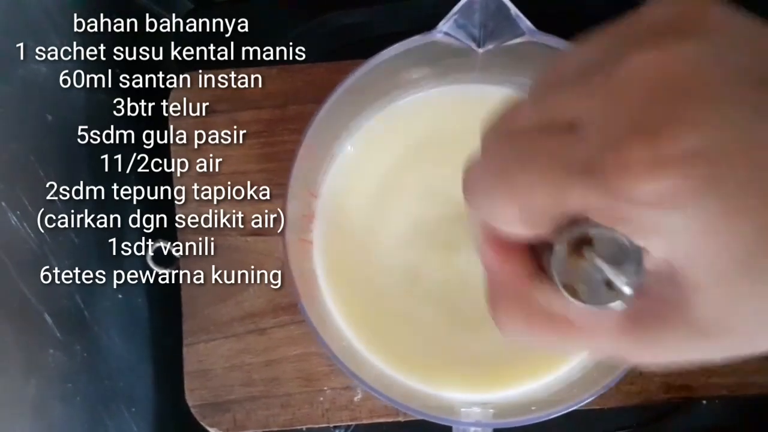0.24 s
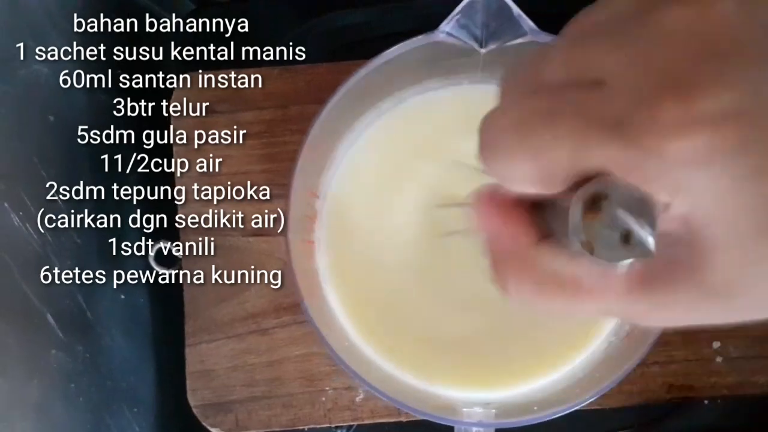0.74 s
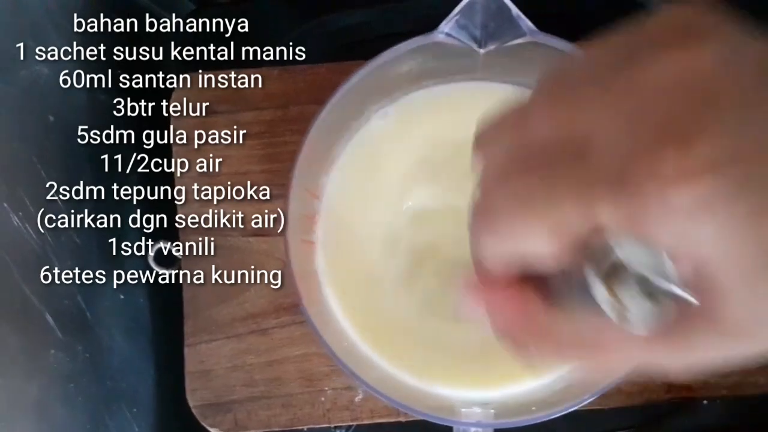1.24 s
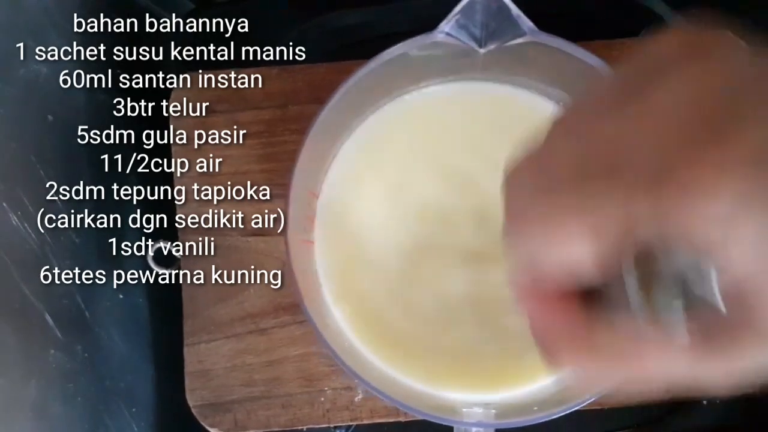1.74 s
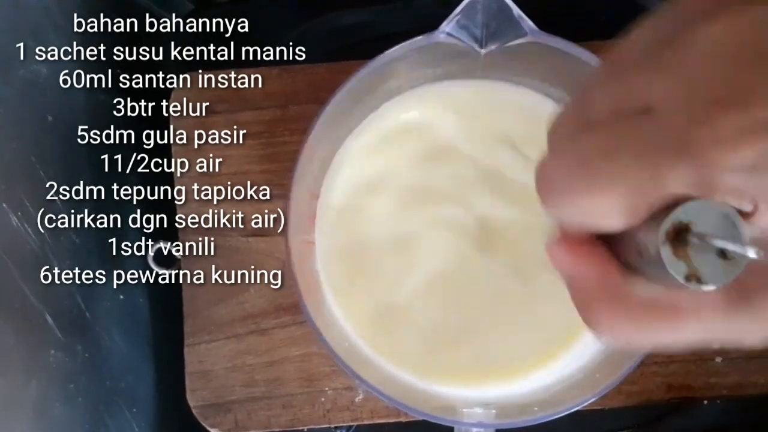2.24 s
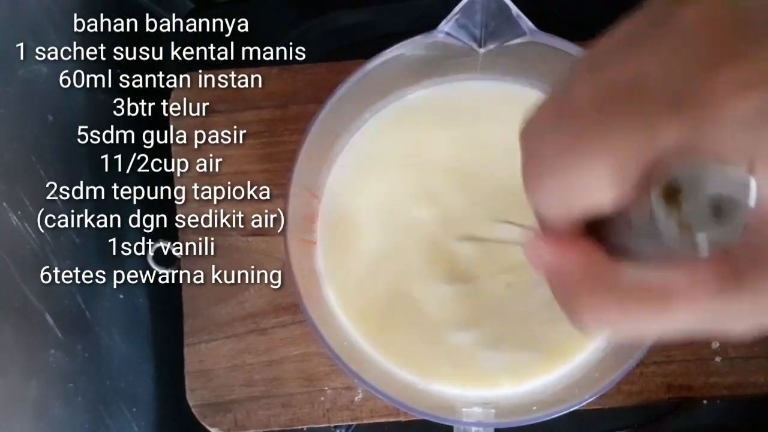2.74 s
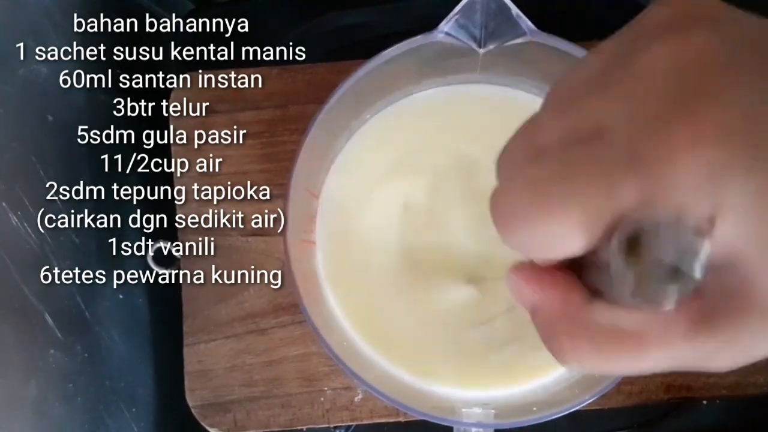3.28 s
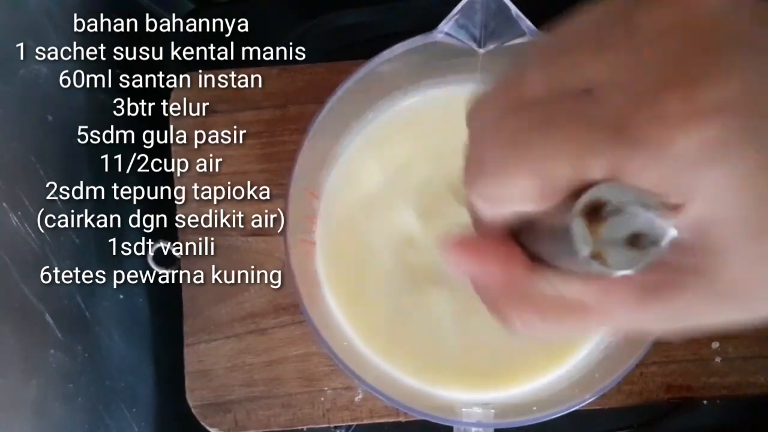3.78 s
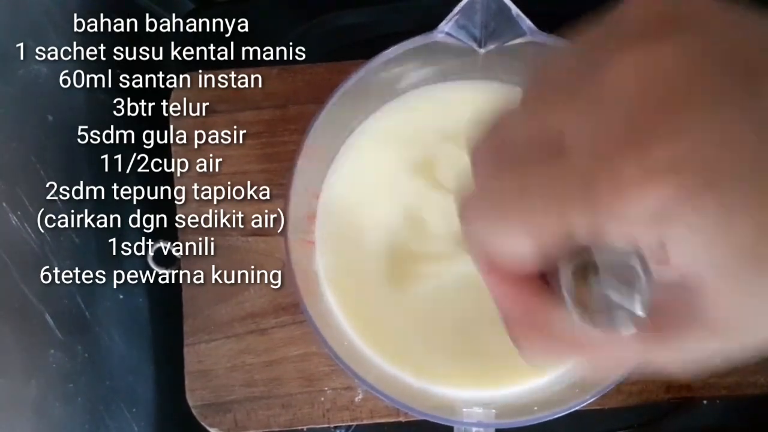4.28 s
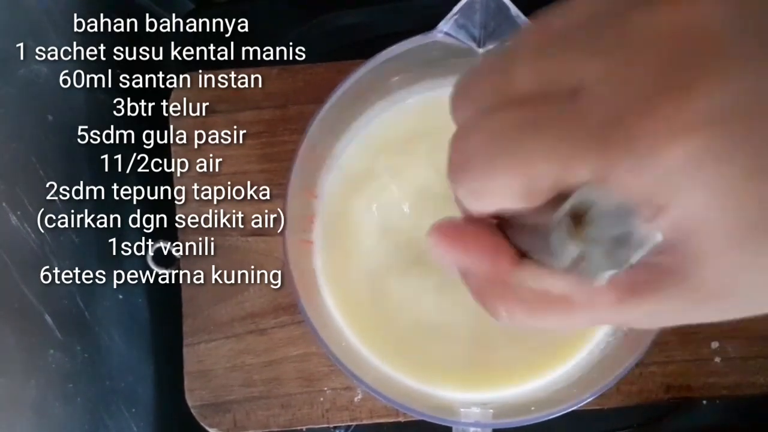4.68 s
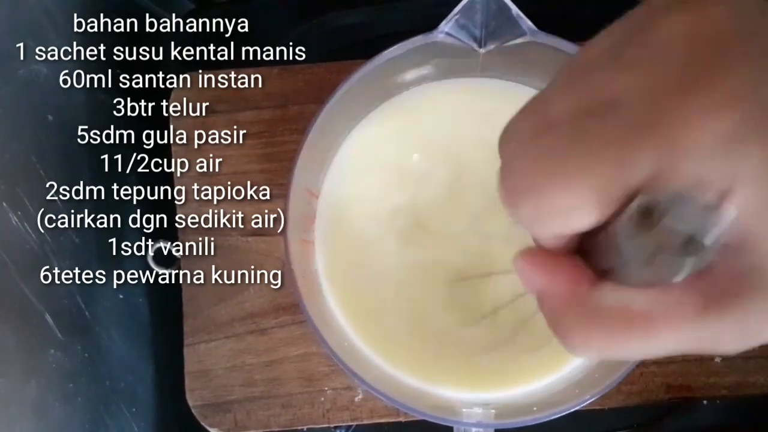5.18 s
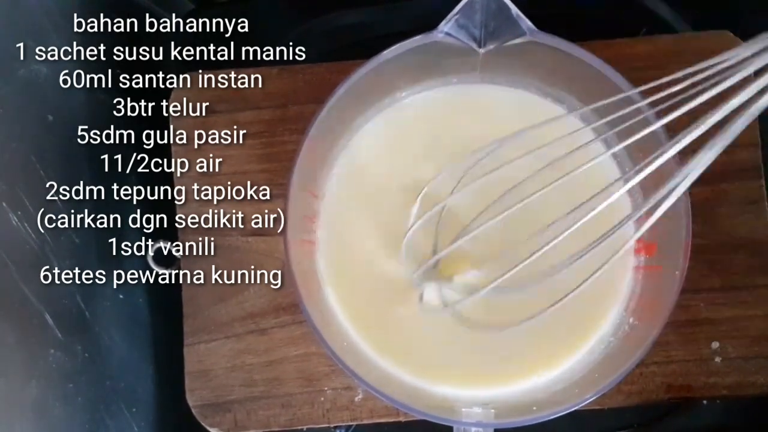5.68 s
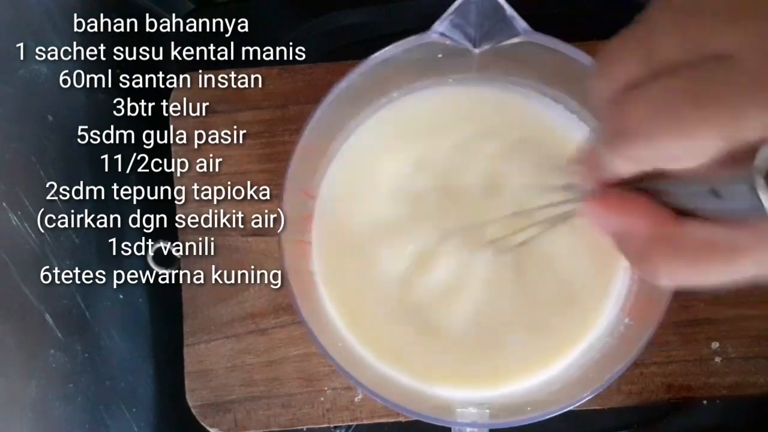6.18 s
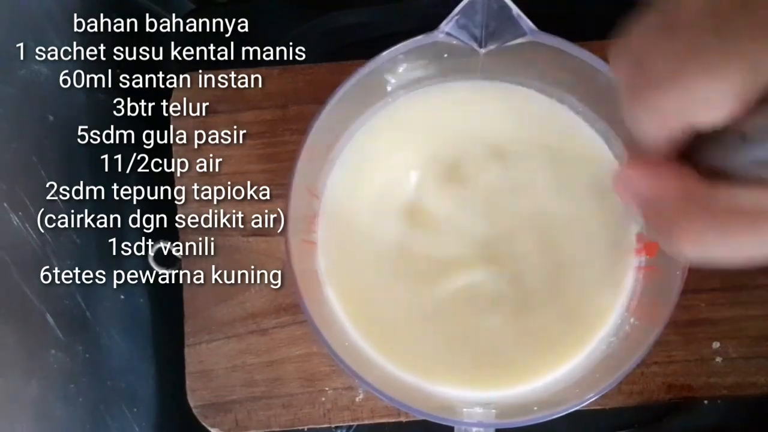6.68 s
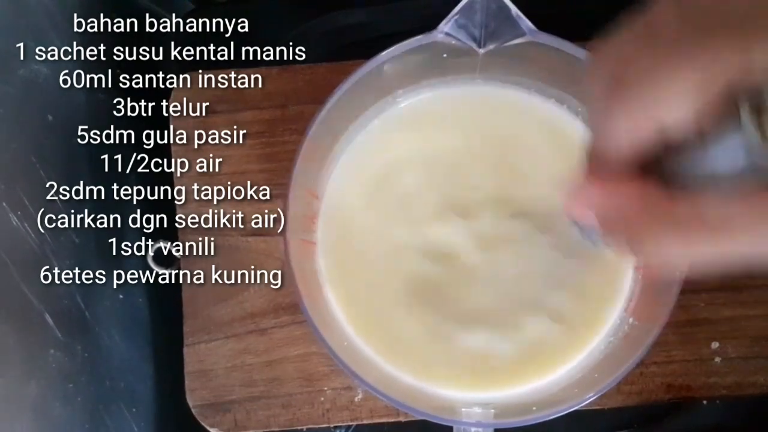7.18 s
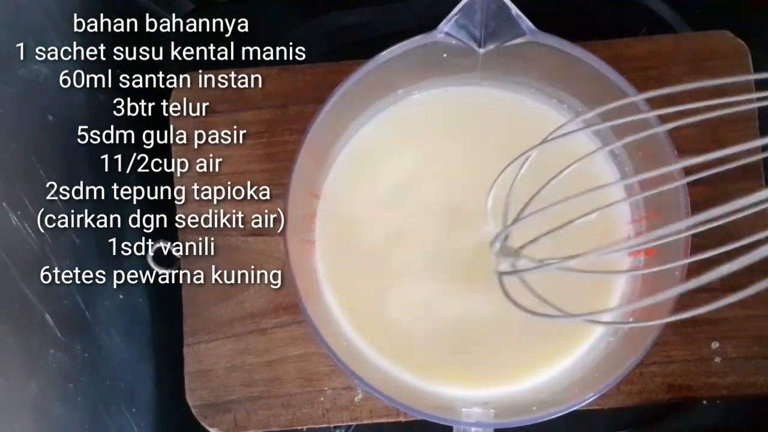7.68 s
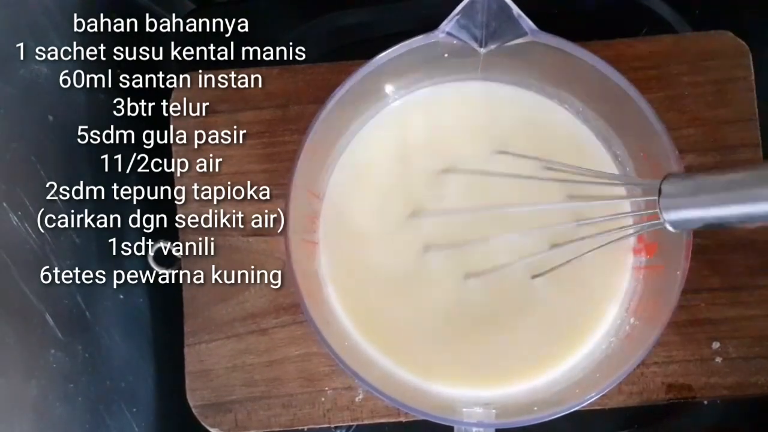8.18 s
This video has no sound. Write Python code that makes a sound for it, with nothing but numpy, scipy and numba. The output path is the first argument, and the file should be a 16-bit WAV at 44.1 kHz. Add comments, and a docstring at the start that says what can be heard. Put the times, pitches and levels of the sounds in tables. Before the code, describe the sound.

Quick, clattering whisking of thin liquid in a plastic jug, with hollow slops and small bubbles, in a hard little kitchen above distant engines.

```python
"""Whisk wires rattle and drag on the wall of a plastic jug; thin batter surges and gulps under them.
Grainy contact noise rings the jug modes; surges and swirl drive its low modes; bubbles are rising tones.
A small hard kitchen answers with a noise tail. Outside, wavering tones are passing engines and shaped
noise is the street. A phone with two microphones tints, rounds and band-limits the sum."""
import sys
import numpy as np
from numba import njit
from scipy import signal
from scipy.fft import rfft, irfft, next_fast_len
from scipy.io import wavfile
from scipy.ndimage import uniform_filter1d

SR = 44100
rng = np.random.default_rng(int(sys.argv[2]) if len(sys.argv) > 2 else 0)


def file_out(sig):
    """Save sig as 16-bit WAV at sys.argv[1]."""
    # one column per channel
    cols = np.atleast_2d(sig).T
    # limit, then scale
    lim = np.clip(cols, -1, 1)
    pcm = np.round(lim * 32767).astype(np.int16)
    wavfile.write(sys.argv[1], SR, pcm)


N = 371763

# Wires meeting the wall: peak t/s, level/dB, low range re level/dB, rise/ms, fall/ms (6 dB times)
TAPS = [(0.0267, -36, -1, 1.8, 1.7), (.051, -32.5, 2, 12.6, 2.6), (.0619, -26, -3, 2.5, 4.9),
        (.0803, -30, 2.5, 1.8, 6.1), (0.1404, -31.5, 2.5, 7.3, 3.5), (.192, -38, -4, 18, 7.7),
        (.2063, -37, 2, 8.8, 19), (.2404, -40, 6, 3.8, 8.7), (.2658, -31, -13, 2.4, 3.2),
        (.283, -34, -2, 1.5, 10), (.321, -35, -3, 6, 3), (0.3558, -35.5, -1, 2.8, 9.1),
        (.402, -37, 2, 1.7, 14), (.4346, -30, -3, 11.5, 6.5), (0.4496, -30, -5, 10.4, 2.9),
        (0.504, -34.5, -8, 2.3, 5.6), (.522, -36, 1, 6.8, 2.1), (.539, -32, -3, 2, 3.1),
        (.5533, -32, -5, 2.2, 2.4), (0.584, -48, 4, 3.1, 4.2), (0.6192, -28.5, 0.5, 4.3, 5.2),
        (0.655, -36, 1, 3.8, 16), (.6936, -32.5, -2, 4.6, 2), (.7069, -33.5, -1, 8.3, 3.5),
        (0.721, -27.5, -6, 1.7, 2.2), (.7474, -31, -9, 2.1, 2.2), (.78, -40, -1, 6.9, 3),
        (0.838, -41, 0, 2.2, 3.5), (.8519, -35, -4, 1.8, 4.7), (0.8668, -27.5, -1, 2.5, 10),
        (.94, -39, 1, 1.8, 8.6), (.962, -37.5, 0, 4.5, 7.6), (0.9938, -26.5, 1.5, 6, 5.5),
        (1.013, -27, -1, 2.8, 2), (1.0693, -43, 0, 1.8, 5.6), (1.093, -31, 0, 8.1, 5.1),
        (1.144, -32, -4, 4.8, 4.1), (1.1567, -32, -1, 3.2, 5.3), (1.172, -36.5, 1, 2.6, 4),
        (1.189, -26, -4.5, 1.9, 3.2), (1.2514, -39.5, 6, 3.1, 4.9), (1.2895, -34, -0.5, 3, 9.8),
        (1.3038, -36.5, 1, 1.3333, 9.4), (1.3391, -49, 14.5, 9.8, 3.6), (1.4, -31.5, -3, 2.9, 5.6),
        (1.4066, -26, -8, 3.4, 4), (1.431, -34, 3, 5, 2.3), (1.438, -31.5, 1, 2.3, 8.9),
        (1.4531, -31.5, -6, 7.1, 4.6), (1.481, -31.5, -6, 1.5, 5.3), (1.509, -39, 8, 4.1, 2.7),
        (1.5367, -34.5, 0, 6.5, 12.4), (1.5833, -38.5, -1.5, 6, 21), (1.6102, -34, -2, 1.8, 3.1),
        (1.701, -32, -8, 5.9, 2.9), (1.7101, -31.5, -9, 3.3, 12), (1.7412, -30, 1, 11.3, 6.8),
        (1.7784, -28.5, -9, 1.3, 1.5), (1.9575, -25.5, -5.5, 3.5, 2.7), (2.042, -32, -3, 6.4, 10),
        (2.065, -30, -8, 1.3, 1.3), (2.096, -38.5, 2, 9.8, 4.1), (2.1203, -44.5, 9, 6.2, 2.1),
        (2.1613, -31.5, 2, 11.6, 4.6), (2.178, -32, 0, 1.6, 3.3), (2.2265, -44, -1, 2.4, 4.6),
        (2.2577, -28, -5, 10.4, 3.5), (2.284, -35, 2, 3.2, 1.8), (2.3035, -40, 0, 7.8, 5.5),
        (2.323, -32.5, 3.5, 1.4, 4.2), (2.3485, -33, -9, 5.5, 3.7), (2.3995, -25.5, -2.5, 2.5, 5),
        (2.4037, -23, -1, 2.5, 5.9), (2.42, -30, -3.5, 3.1, 12), (2.4802, -28, 1.5, 1.1, 5.9),
        (2.4937, -25, -8, 2.5, 3.5), (2.558, -21, -2.5, 4.3, 6.4), (2.626, -25.5, -20, 1.7, 3.8),
        (2.639, -38, 4.5, 9.6, 1.2), (2.713, -19.5, -3.5, 8.7, 3.2), (2.7693, -32.5, -6, 1.2, 6.4),
        (2.7923, -29.5, -7.5, 8.6, 6.2), (2.8064, -35.5, -4, 2.1, 3.4), (2.863, -22, -3, 2.3, 5.1),
        (2.9161, -35, -4, 3.8, 4.8), (2.9283, -26, -10.5, 5.3, 5.7), (2.9994, -27.5, 0, 1.8, 6.3),
        (3.0198, -33, 4.5, 2.5, 5), (3.0565, -24, -8, 1.5, 5), (3.0686, -25, -5.5, 6.5, 5.1),
        (3.1428, -24, -8.5, 6.9, 3.1), (3.1572, -33, 4.5, 4.5, 1.8), (3.1922, -25.5, 0, 2.1, 5),
        (3.201, -24, -3, 2.1, 3.6), (3.279, -33.5, 3.5, 6.1, 11), (3.3064, -30.5, -2, 1.5, 1.8),
        (3.3418, -32, 2, 6, 10.3), (3.411, -20, -3, 1.85, 7.8), (3.4556, -36.5, -2, 7.3, 2.3),
        (3.485, -27.5, -5, 1.6, 6.4), (3.5563, -23, -2, 4.4, 8.4), (3.5827, -31, -1, 3.6, 3.6),
        (3.6444, -27.5, -4, 3.3, 5.9), (3.7197, -21.5, -2.5, 3.5, 3.7), (3.734, -32, 3.5, 4.6, 6.4),
        (3.772, -30.5, -5, 2, 7.5), (3.795, -28.5, -6.5, 4.7, 3), (3.8584, -22.5, -4, 1.1, 5.4),
        (3.885, -30, 2.5, 8.3, 2.6), (3.905, -40, 5, 3.3, 8.3), (3.9392, -42, -1, 7.2, 9.8),
        (4.0097, -25, 0, 4.2, 6.8), (4.0258, -29.5, 2.5, 5.7, 2.6), (4.078, -26.5, -6, 3.4, 6.1),
        (4.156, -24.5, -3, 1.9, 7.9), (4.214, -36, 1, 2, 5), (4.2235, -25.5, -5, 3.2, 4.3),
        (4.2936, -23.5, -4, 3.4, 9.6), (4.3156, -31, 3, 2.9, 5.5), (4.3514, -35.5, 1, 2.1, 4),
        (4.3617, -31.5, -2, 2.8, 7.7), (4.438, -23, -1.5, 1.6, 6.3), (4.446, -24.5, -7, 3.3, 4.3),
        (4.4753, -34, 3, 4.1, 3.6), (4.503, -33, -5.5, 3.2, 7.8), (4.5959, -34, 3, 5.2, 6.5),
        (4.6207, -30, 9.5, 6.2, 3.4), (4.659, -31.5, -11, 10, 5.2), (4.674, -27, -8, 2.6, 2.7),
        (4.7423, -25.5, 0, 3.1, 1.4), (4.766, -31, 3.5, 6.6, 3), (4.8102, -24.5, -7, 1.25, 2.7),
        (4.8809, -28, 1.5, 3.4, 5.5), (4.89, -29, 0, 4, 9.1), (4.9517, -29.5, -14.5, 2.3, 8.2),
        (4.9672, -28.5, -0.5, 1.9, 2.6), (5.0371, -35, 1.5, 5.8, 7.8), (5.0562, -37.5, 4.5, 5.8, 12),
        (5.094, -24.5, -6.5, 3.3, 5.3), (5.1058, -25, -4, 1.8, 3.9), (5.176, -26.5, -5, 7.1, 6.9),
        (5.201, -39.5, 2.5, 2.7, 5.3), (5.22, -40, 7.5, 5.2, 9), (5.237, -25, -13.5, 3.3, 7.9),
        (5.252, -26, -7, 1.4, 3.1), (5.3254, -30, -3, 4, 6.7), (5.343, -29, -5, 2.8, 2.7),
        (5.3952, -23.5, -8.5, 6.7, 3.6), (5.4825, -42.5, 7.5, 3.2, 6.5), (5.504, -41.5, 5, 6.2, 22),
        (5.533, -23.5, -4.5, 1.3, 3.5), (5.958, -55, -13.5, 1, 3), (5.9814, -56, -8, 1.8, 1.6),
        (5.9965, -56, -7, 1.7, 1.5), (6.0311, -43.5, 5, 5.5, 1.6), (6.0474, -47.5, 13.5, 2.4, 4.6),
        (6.0735, -22.5, -2.5, 1.9, 1.9), (6.1456, -32.5, -7, 3.9, 6.3), (6.221, -33.5, 2, 1.9, 11),
        (6.228, -32.5, -2, 1.8, 4.3), (6.2946, -29.5, -15, 2.5, 3.2), (6.3058, -27, -9.5, 2.6, 4.5),
        (6.388, -19, -5.5, 5.3, 2.2), (6.424, -41, 5, 4.9, 4.9), (6.448, -28, -13, 2, 2.6),
        (6.459, -26.5, -10, 2.6, 4.2), (6.5294, -19, -3, 3.5, 5.7), (6.546, -30.5, 3, 2.9, 3.3),
        (6.5932, -38, -6, 1.8, 2.4), (6.612, -25, -5.5, 0.59, 0.48), (6.698, -35.5, 2.5, 1.5, 3.1),
        (6.7135, -34, -9, 2.5, 1.6), (6.7406, -29.5, -6, 1.5, 5.6), (6.756, -36, -2, 1.8, 5),
        (6.8344, -28.5, 0.5, 2.6, 6.7), (6.8792, -38, -1, 10, 9.4), (6.8955, -20.5, -6, 1.5, 2.5),
        (6.971, -21, -8, 1.5, 1.7), (6.9998, -39.5, 2.5, 14, 13), (7.0398, -28.5, -7.5, 1.7, 7.2),
        (7.051, -25, -3, 2.1, 2.7), (7.117, -34.5, 4, 14, 2.7), (7.133, -23, -7, 2.9, 2.2),
        (7.2139, -37.5, 2, 3.7, 6.9), (7.2882, -26, 1.5, 1.7, 3.4), (7.3113, -51, 8, 2, 1.7),
        (7.3575, -52, 9, 5.4, 9), (7.381, -31, -6, 2.4, 1.7), (8.1582, -43.5, -4.5, 1.6, 3.1),
        (8.2086, -29, 15.5, 2.1, 3.4), (8.234, -31, 6, 6.6, 1.6), (8.2517, -49, 1, 3.4, 3.8),
        (8.3092, -55, 1, 3.6, 3.2), (8.3204, -44, 7.5, 11, 1)]
# Jug and wire modes by range: f/Hz, width/Hz, level/dB, mean lead of left/rad
LOW_MODES = [(1374, 65, 1.5, 0.93), (2159, 42, 1, 2.16), (2238, 87, 3, 0.73)]
MID_MODES = [(2881, 27, -10, 1.72), (3392, 61, -6, 0.83), (3851, 98, -2, 1.1), (4354, 200, -2.5, -3),
             (4580, 73, -7.5, 1.37), (4970, 140, -14.5, 2.5), (5620, 140, -11.5, 1.5)]
HIGH_MODES = [(6230, 210, -4.5, 2), (7260, 440, 0.5, 1.5), (8160, 198, -5, 9.5), (9080, 560, 1.5, -11),
              (9550, 250, 5, -2.5), (10350, 290, 1.5, -3.4), (10930, 370, 0.5, 1.84),
              (11940, 230, 1.5, 9.5), (12500, 420, -5.5, -13.5)]
# Weight of the hollow mode below 2 kHz against the sharp ones: t/s, level/dB
HOLLOW = [(0, -6.5), (1.5, -3), (2.1, -8.5), (3.2, -4), (3.6, -11.5), (4.4, -5.5), (5.6, -5.5), (6.4, 5.5),
          (6.8, -7.5), (8.2, 6), (8.4, -28)]
# Bouts of stirring, one table each: t/s, wire drag level/dB, batter swirl level/dB
STIR_BOUTS = [
    [(0, -43.5, -40.5), (.46, -44.5, -44.5), (1.1, -47.5, -41.5), (1.62, -52.5, -43), (1.8, -55, -42.5),
     (1.9, -70, -61)],
    [(1.95, -53, -56), (2.15, -52, -46.5), (2.4, -58, -40.5), (3.0, -56, -53.5), (3.4, -52, -47),
     (4.4, -55.5, -52), (5.37, -56.5, -46), (5.62, -65, -52)],
    [(5.97, -72, -63), (6.2, -48, -42.5), (6.45, -58, -46), (6.7, -51.5, -49), (7.0, -58, -40.5),
     (7.3, -54, -50.5), (7.48, -70, -52)],
    [(8.15, -56, -70), (8.43, -74, -70)],
]
# Modes of the full jug: f/Hz, width/Hz, level/dB, mean lead of left/rad
JUG_BODY_MODES = [(205, 32, -13, 0), (280, 21, -2, -0.79), (341.6, 39.5, -4, 0.2), (375, 33, 0.5, 0.31),
                  (434, 220, -4, 0.48), (595, 51, -4, -2)]
# Batter thrown against the wall: t/s, drive level/dB, favoured f/Hz
SURGES = [(0.05, -31, 374), (0.322, -37, 318), (0.493, -31.5, 334), (0.584, -30, 334), (0.756, -29.5, 334),
          (0.872, -35.5, 377), (0.993, -32, 374), (1.121, -35, 336), (1.227, -29.5, 331), (1.353, -35, 361),
          (1.417, -38, 320), (1.512, -34, 396), (1.667, -31, 363), (1.728, -35, 296), (2.152, -35, 277),
          (2.425, -26, 332), (2.567, -27, 362), (2.73, -29.5, 353), (2.874, -26.5, 269), (3.031, -33, 277),
          (3.162, -28, 277), (3.309, -31, 277), (3.456, -27.5, 275), (3.581, -27.5, 350),
          (3.733, -26.5, 275), (3.884, -32, 361), (4.025, -32, 374), (4.171, -29.5, 390), (4.321, -27, 374),
          (4.474, -26.5, 277), (4.619, -26.5, 297), (4.765, -26.5, 277), (5.056, -30.5, 337),
          (5.213, -28.5, 278), (5.342, -27, 350), (5.485, -31, 273), (6.077, -27.5, 374), (6.23, -29, 377),
          (6.391, -28.5, 372), (6.546, -26.5, 355), (6.702, -30, 293), (6.837, -26.5, 270),
          (6.972, -31.5, 373), (7.038, -31, 207), (7.133, -33.5, 374), (7.286, -36, 202), (8.207, -19, 358),
          (8.318, -38, 296)]
# Large bubbles: t/s, level/dB (mean of both sides), starting f/Hz
GULPS = [(0.58, -32, 458), (0.915, -29, 460), (1.228, -32, 444), (1.36, -33, 463), (1.663, -29, 468)]
# Passing engines: start t/s, end t/s, first f/Hz, last f/Hz, level/dB
ENGINES = [(-.3, 1.094, 119.7, 97.9, -46.5), (1.1, 2.002, 95.9, 85.6, -51),
           (5.452, 6.307, 68.8, 69.4, -42.5), (6.25, 6.68, 71.4, 64.7, -45.5),
           (7.113, 8.0, 65.4, 58.2, -44), (7.4, 8.3, 127.3, 120, -46.5)]
# Street spectrum before the level curves: f/Hz, relative density/dB
STREET_SPECTRUM = [(15, -29), (25, -8.5), (74, 6.5), (114, 4.5), (326, -18.5), (560, -23), (796, -25.5),
                   (887, -26), (2110, -34), (3250, -38.5), (9840, -53), (12500, -50), (16000, -88.5)]
# Street bass: t/s, level/dB
RUMBLE = [(0, -47), (1.27, -47), (1.69, -45), (2.32, -49.5), (3.73, -50), (4.93, -55), (5.63, -50),
          (6.76, -47.5), (7.96, -44.5), (8.43, -46.5)]
# Street above the bass, gain on its spectrum: t/s, tyre drone level/dB, hiss level/dB
HISS = [(0, -31.5, -21), (1.9, -36, -36), (3, -55, -41), (5.6, -36, -35), (5.95, -35, -42.5),
        (6.8, -33, -38), (7.4, -28.5, -31.5), (7.7, -31, -27), (8.1, -27.5, -32), (8.43, -30.5, -30.5)]
# Microphone colour: f/Hz, left minus right level/dB
MIC_BALANCE = [(60, -0.8), (130, -0.5), (250, 0), (500, 0.5), (1200, -2), (2400, 0.3), (4400, 0),
               (8100, -2), (15000, 1.5)]

# low, middle, high range: unpitched share, drag offset, fall time re table
CRACK_DB, DRAG_OFFSET_DB, FALL_SHARE = (-13, -4, -4.5), (-7, -4, -4), (1.47, 1, 0.85)
HOLLOW_SPREAD_DB, SPOT_SPREAD_DB = 4.5, 4.5
# treble of a tap: stronger the harder and the more suddenly it lands
BRIGHT_DB, BRIGHT_PER_DB, BRIGHT_DB_PER_MS = 2.5, 0.01, -0.3275
SWELL_STEEPNESS = 4.2  # the first wires land suddenly, the rest pile up
RATTLE_DB, RATTLE_T60_S = -13, 0.11  # wires shiver on after a tap; T60 scaled by FALL_SHARE
# stray wires: level re drag, delay after a tap
TICKS_PER_S, TICK_DB, TICK_SPREAD_DB = 22, 1, 3.5
TICK_RISE_MS, TICK_FALL_MS, TICK_DELAY_S = 2.64, 5.5, (0.012, 0.0449)
# surge drive of a jug mode: gain, loss with distance from the favoured pitch, furthest distance counted
SURGE_GAIN_DB, SURGE_LOSS_DB_PER_HZ, SURGE_REACH_HZ = 3.1, 0.275, 36
SURGE_UPPER_DB = -2  # the two upper jug modes answer every surge
SWIRL_MODE_DB = (-0.5, -1, -0.9, -1, 5.6, 3.0)
KITCHEN_T60_S, KITCHEN_DB, KITCHEN_DULL_HZ = 0.27, -12.5, 7000
ENGINE_SWELL_S = 0.18
ALIKE_HZ = 642  # corner above which left and right noise part
SOFT_HZ, TOP_HZ = 15000, 16500

T = np.arange(N) / SR
SIZE = next_fast_len(N + SR)
F = np.maximum(np.arange(SIZE // 2 + 1) * SR / SIZE, 1)


def undb(db):
    """Level/dB to amplitude ratio."""
    return np.exp(np.log(10) / 20 * np.asarray(db))


def unit(x):
    """Scale to unit RMS."""
    return x / np.sqrt(np.mean(x ** 2))


def shape(x, response):
    """Filter by a frequency response."""
    return irfft(rfft(x, SIZE) * response, SIZE)[..., :N]


def walk(rate_hz):
    """Random levels held 1 / rate and slewed twice; spread near 1."""
    k = int(SR / rate_hz)
    steps = np.repeat(rng.standard_normal(N // k + 1), k)
    return 1.3 * uniform_filter1d(uniform_filter1d(steps, k), k)[:N]


def curve(table, column):
    """One column of a table over time, -120 dB outside it."""
    rows = np.array(table)
    return np.interp(T, rows[:, 0], rows[:, column], left=-120, right=-120)


def stir(column):
    """One column of the stirring bouts over time."""
    return np.max([curve(bout, column) for bout in STIR_BOUTS], axis=0)


def stereo_noise():
    """Noise alike left and right in the bass only, from mid and side noise."""
    apart = F ** 2 / (F ** 2 + ALIKE_HZ ** 2)
    mid, side = rng.standard_normal((2, N))
    mid = shape(mid, np.sqrt(1 - apart / 2))
    side = shape(side, np.sqrt(apart / 2))
    return mid + np.array([[1], [-1]]) * side


@njit(fastmath=True)
def ring(x, which, pole, gain):
    """Bank of one-pole complex modes; each event has its own poles and left and right gains."""
    out, z = np.zeros((2, len(x))), np.zeros((2, pole.shape[1]), np.complex128)
    for i in range(len(x)):
        for side in range(2):
            for k in range(pole.shape[1]):
                z[side, k] = z[side, k] * pole[which[i], k] + x[i] * gain[side, which[i], k]
                out[side, i] += z[side, k].imag
    return out


def strike(x, which, modes, extra_db, detune=0.013, lead_spread_rad=1.0):
    """Drive a mode table with x; extra_db is events x modes, pitch and lead vary by event."""
    hz, width_hz, db, lead_rad = np.transpose(modes)
    chance = rng.standard_normal((len(extra_db), 2, len(modes)))
    fade = np.exp(-np.pi * width_hz / SR)
    pole = fade * np.exp(2j * np.pi * hz * (1 + detune * chance[:, 0]) / SR)
    # before the levels: unit noise in, unit power out
    size = undb(db + extra_db) * np.sqrt(2 * (1 - fade ** 2))
    turn = np.exp(0.5j * (lead_rad + lead_spread_rad * chance[:, 1]))
    return ring(x + 1e-18, which, pole, np.array([size * turn, size / turn]))  # offset avoids denormals


def whisk():
    """Contacts ring the jug; each tap lands elsewhere, so the modes change weight tap by tap."""
    taps, out = np.array(TAPS), 0
    onset_s = taps[:, 0] - taps[:, 3] / 1000
    which = np.maximum(np.searchsorted(onset_s, T) - 1, 0)
    hollow_db = np.interp(taps[:, :1], *np.transpose(HOLLOW))
    hollow_db = hollow_db + HOLLOW_SPREAD_DB * rng.standard_normal((len(taps), 1))
    for force, modes, crack_db in zip(contact_force(), (LOW_MODES, MID_MODES, HIGH_MODES), CRACK_DB):
        hz, _, db, _ = np.transpose(modes)
        spot_db = SPOT_SPREAD_DB * rng.standard_normal((len(taps), len(modes))) * (hz > 2000)
        spot_db = spot_db + hollow_db * (hz < 2000)
        # same total strength for every tap
        spot_db -= 10 * np.log10(np.sum(undb(2 * (db + spot_db)), axis=1, keepdims=True))
        out = out + strike(force * chatter(), which, modes, spot_db)
        band = signal.butter(1, [0.77 * hz[0], 1.195 * hz[-1]], "bandpass", fs=SR, output="sos")
        crack = signal.sosfilt(np.vstack([band] * 3), force * np.array([chatter(), chatter()]))
        out = out + undb(crack_db) * np.sqrt(SR / (hz[-1] - hz[0])) * crack
    return out


def contact_force():
    """Envelopes, range x time: taps swell steeply, die away and shiver on; the drag fills in."""
    power = np.zeros((3, N))
    for s, db, low_db, rise_ms, fall_ms in np.vstack([TAPS, ticks()]):
        high_db = BRIGHT_DB + BRIGHT_PER_DB * (db + 28) + BRIGHT_DB_PER_MS * rise_ms
        range_db = db + np.array([[low_db], [0], [high_db]])
        a = max(int((s - 0.025) * SR), 0)
        ms = 1000 * (T[a:a + SR // 9] - s)
        # power ratios: -12 here is a 6 dB drop in level
        swell = undb(-12 * (np.maximum(-ms, 0) / max(rise_ms, 0.3)) ** SWELL_STEEPNESS)
        after_ms = np.maximum(ms, 0) / np.array(FALL_SHARE)[:, None]
        dying = undb(-12 * after_ms / max(fall_ms, 0.5))
        shiver = undb(2 * (RATTLE_DB - 60 * after_ms / 1000 / RATTLE_T60_S))
        power[:, a:a + len(ms)] += undb(2 * range_db) * swell * (dying + shiver)
    drag_db = stir(1) + 1.4 * walk(60)
    drag_power = undb(2 * (drag_db + np.array(DRAG_OFFSET_DB)[:, None]))
    return np.sqrt(power + drag_power)


def ticks():
    """Stray wires follow a tap to the wall, louder with stronger stirring; rows as TAPS."""
    pick, late, size, low = rng.random((int(N / SR * TICKS_PER_S), 4)).T
    tap_s = np.array(TAPS)[(pick * len(TAPS)).astype(int), 0]
    when_s = tap_s + np.interp(late, [0, 1], TICK_DELAY_S)
    db = np.interp(when_s, T, stir(1)) + TICK_DB - TICK_SPREAD_DB * np.log(1 - size)
    return np.transpose([when_s, db, 8 * low - 4, TICK_RISE_MS + 0 * db, TICK_FALL_MS + 0 * db])


def chatter(scatter_db=2.0, grain_ms=1.1):
    """Dense wire contacts: noise in short grains of unequal size."""
    k = int(grain_ms * SR / 1000)
    grain = undb(scatter_db * rng.exponential(size=N // k + 1))
    size = uniform_filter1d(np.repeat(grain, k)[:N], k)
    return unit(size * rng.standard_normal(N))


def batter(push_s=0.0041, slop_t60_s=0.32, slop_db=-13):
    """Surges shove the low modes of the full jug and slop on; swirl stirs them steadily; bubbles burst."""
    t, rows = T[:SR // 4], np.array(SURGES)
    push, noise = np.zeros(N + len(t)), rng.standard_normal(N + len(t))
    shove = 0.26 * np.sin(2 * np.pi * 318 * t) * np.exp(-t / push_s) * (1 - np.exp(-t / push_s))
    slop = undb(slop_db - 60 * t / slop_t60_s)
    for s, db in rows[:, :2]:
        a = int(s * SR)
        push[a:a + len(t)] += undb(db) * (shove + slop * noise[a:a + len(t)])
    which = np.maximum(np.searchsorted(rows[:, 0], T) - 1, 0)
    off_hz = np.abs(rows[:, 2:] - np.array(JUG_BODY_MODES)[:, 0])
    drive_db = SURGE_GAIN_DB - SURGE_LOSS_DB_PER_HZ * np.minimum(off_hz, SURGE_REACH_HZ)
    drive_db[:, -2:] = SURGE_UPPER_DB
    surges = strike(push[:N], which, JUG_BODY_MODES, drive_db, detune=0.022, lead_spread_rad=0.22)
    swirl_db = stir(2)
    swirl = undb(swirl_db - 10.5 + 4.35 * walk(30)) * rng.standard_normal(N)
    steady = strike(swirl, 0 * which, JUG_BODY_MODES, np.array([SWIRL_MODE_DB]),
                    detune=0, lead_spread_rad=0)
    return steady + bubbles(swirl_db) + surges


def bubbles(swirl_db, per_s=22, cycles=6, glide=0.6, size_db=8):
    """Air in the batter bursts in short rising gulps, many small and a few large, all leaning right."""
    out, t = np.zeros((2, N + SR)), T[:SR // 25]
    when, pitch, size, pan = rng.random((int(N / SR * per_s), 4)).T
    small_db = swirl_db[(when * N).astype(int)] + size_db - 8.9 * size
    small = np.transpose([when * N / SR, small_db, 380 * 2.6 ** pitch])
    pans = np.append(pan, np.full(len(GULPS), 0.5))
    for (s, db, hz), side in zip(np.vstack([small, GULPS]), pans):
        a, turns = int(s * SR), hz * t
        tone = np.sin(2 * np.pi * turns * (1 + glide * turns / cycles / 2))
        gulp = tone * np.exp(-3 * turns / cycles)
        side_db = np.array([[3], [-3]]) * (2 * side - 3.0)
        out[:, a:a + len(t)] += undb(db + side_db) * gulp
    return out[:, :N]


def kitchen(x):
    """Walls answer with a decaying, dulled noise tail, differing left and right above the bass."""
    t = T[:SR // 2]
    tail = stereo_noise()[:, :len(t)] * undb(-60 * t / KITCHEN_T60_S) * (1 - np.exp(-t / 0.00074))
    tail = undb(KITCHEN_DB) * tail / np.sqrt(np.sum(tail ** 2) / 2)
    return shape(x, 1 + rfft(tail, SIZE) / (1 + 1j * F / KITCHEN_DULL_HZ))


def engines(waver=0.0209, rough_db=2.0):
    """Distant drones: sines that swell, glide (mostly down) and fade, wavering in pitch and level."""
    out = 0
    for start_s, end_s, first_hz, last_hz, db in ENGINES:
        hz = np.interp(T, [start_s, end_s], [first_hz, last_hz]) * (1 + waver * walk(25))
        phase = 2 * np.pi * np.cumsum(hz) / SR
        swell = np.clip(np.minimum(T - start_s, end_s - T) / ENGINE_SWELL_S, 0, 1)
        out = out + np.sqrt(2) * swell * undb(db + rough_db * walk(5.5)) * np.sin(phase)
    return out


def street():
    """Traffic through the house: shaped noise whose rumble, tyre drone and hiss swell apart."""
    hz, db = np.transpose(STREET_SPECTRUM)
    x = shape(stereo_noise(), undb(np.interp(np.log(F), np.log(hz), db)))
    low = shape(x, 1 / (1 + (F / 250) ** 4))
    below_hiss = shape(x, 1 / (1 + (F / 2000) ** 2))
    rumble = low * undb(curve(RUMBLE, 1))
    drone = (below_hiss - low) * undb(curve(HISS, 1) + 2.1 * walk(2.14))
    hiss = (x - below_hiss) * undb(curve(HISS, 2))
    return (rumble + drone + hiss) / np.sqrt(np.mean(low ** 2))


def scene():
    """Whisk and batter in the kitchen, engines and street outside."""
    return kitchen(whisk() + batter()) + engines() + street()


def record(dry):
    """Microphones differ a little in colour; the phone rounds peaks, fades the top and cuts it off."""
    hz, db = np.transpose(MIC_BALANCE)
    tilt_db = np.interp(np.log(F), np.log(hz), db) * np.array([[0.5], [-0.5]])
    rounded = np.tanh(1.25 * shape(dry, undb(tilt_db))) / 1.25
    soft = signal.sosfilt(signal.butter(6, SOFT_HZ, fs=SR, output="sos"), rounded)
    return signal.sosfilt(signal.ellip(10, 0.2, 80, TOP_HZ, fs=SR, output="sos"), soft)


dry = scene()
out = record(dry)
file_out(out)
```